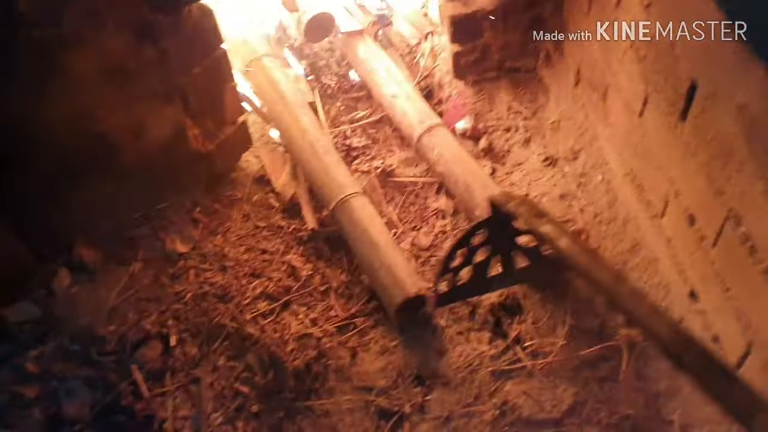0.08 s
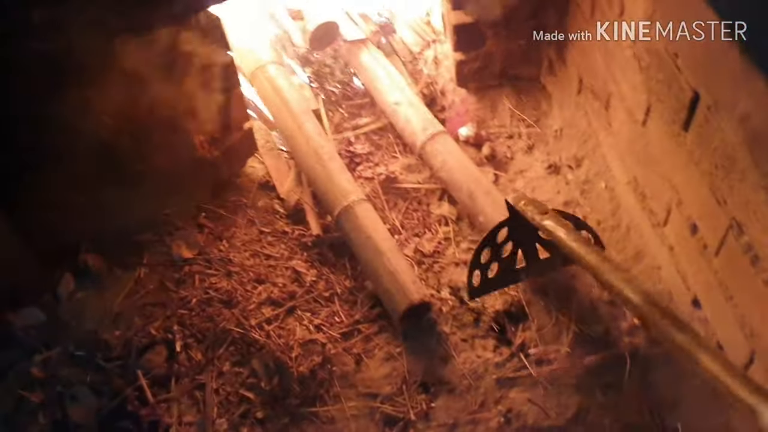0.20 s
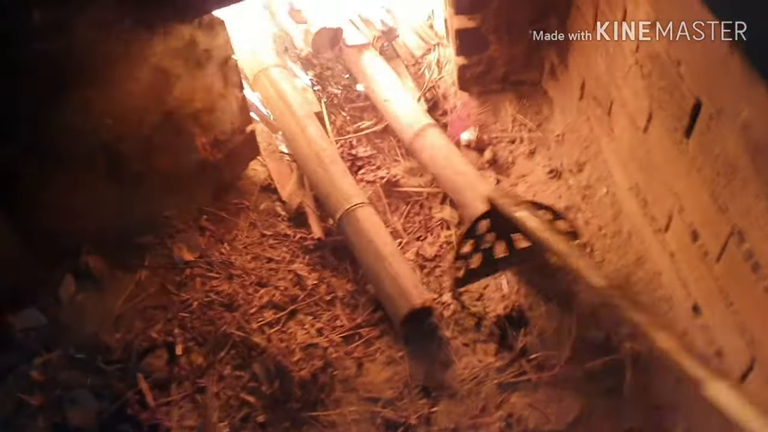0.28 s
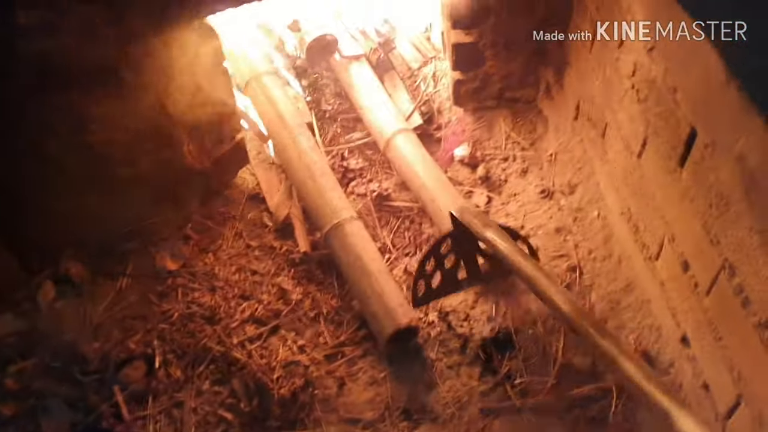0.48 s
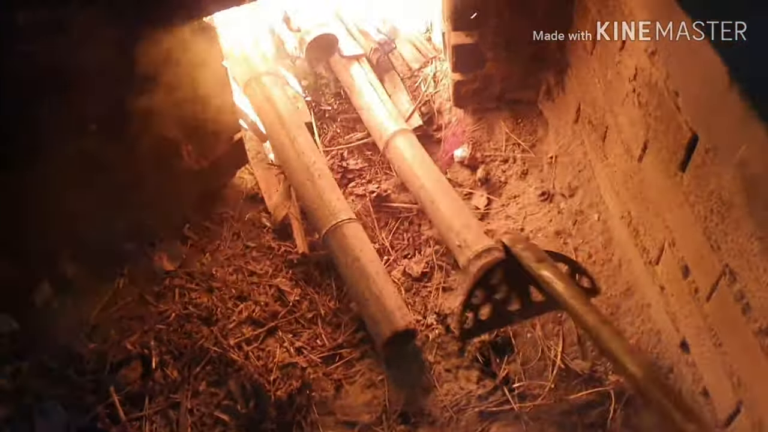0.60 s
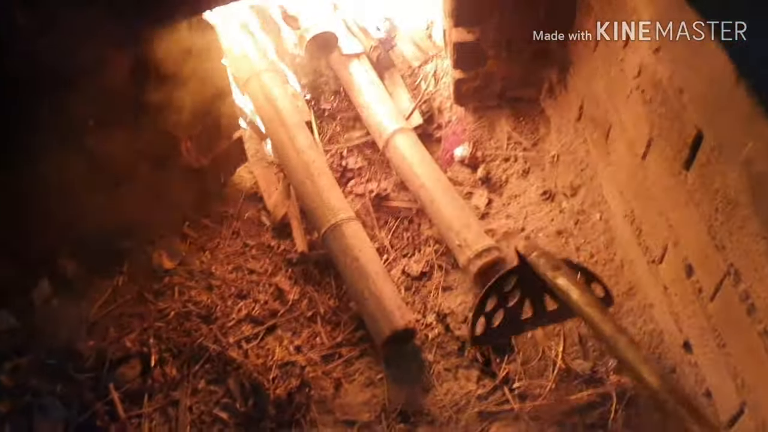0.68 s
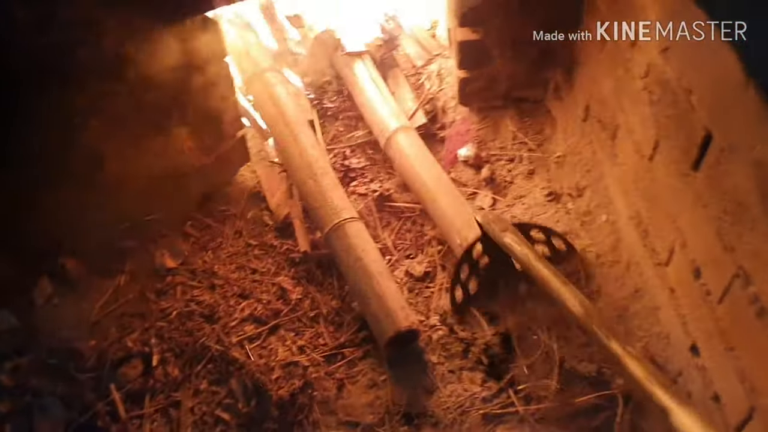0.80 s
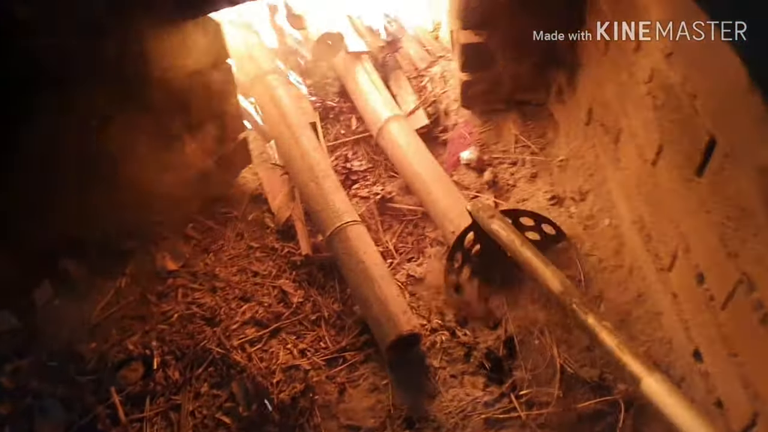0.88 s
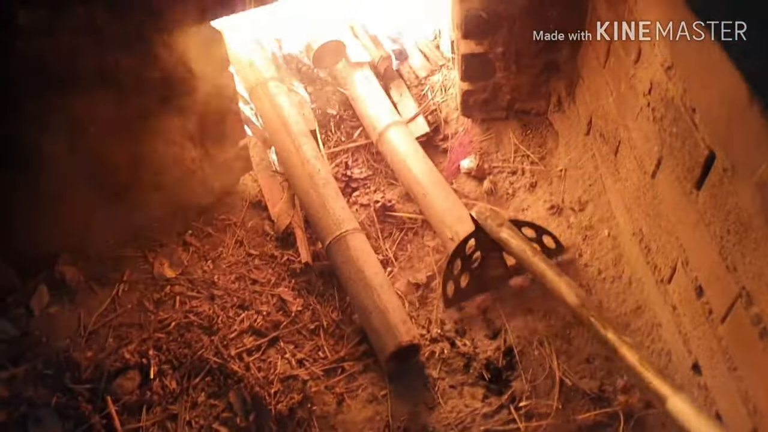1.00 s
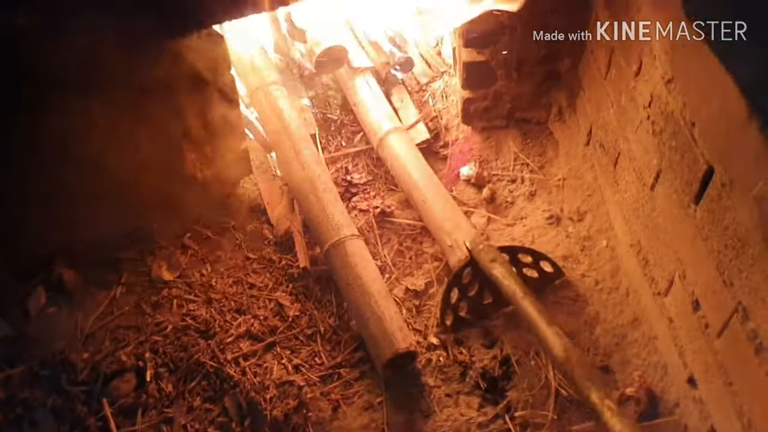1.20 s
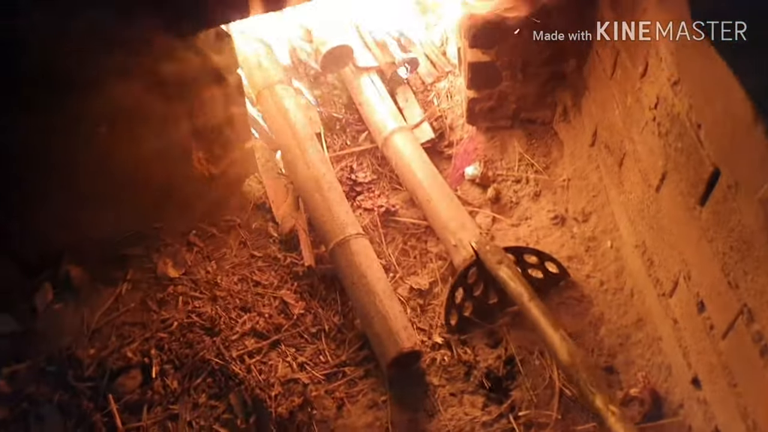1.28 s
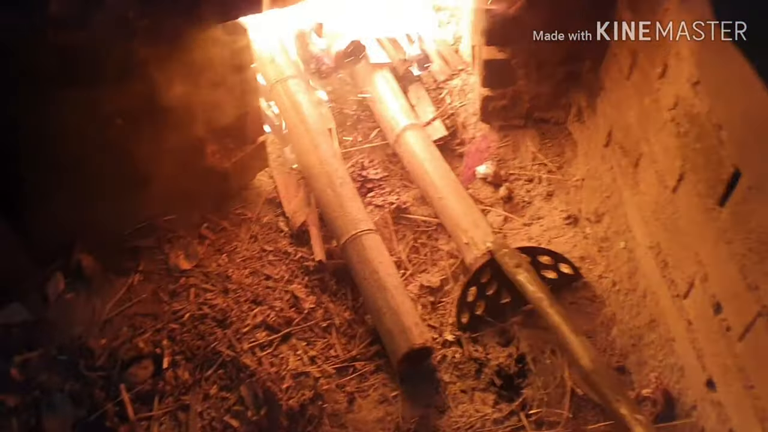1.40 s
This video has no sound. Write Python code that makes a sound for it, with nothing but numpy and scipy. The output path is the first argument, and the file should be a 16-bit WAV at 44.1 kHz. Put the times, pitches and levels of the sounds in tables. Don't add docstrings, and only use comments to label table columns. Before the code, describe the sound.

Bamboo poles clatter with sharp woody knocks, a bursting snap and a metal rake clank over fire

```python
import sys
import numpy as np
from scipy import signal
from scipy.io import wavfile

SR = 44100
rng = np.random.default_rng(int(sys.argv[2]) if len(sys.argv) > 2 else 0)


def to_wav(sig):
    pcm = np.clip(np.atleast_2d(sig), -1, 1) * 32767
    pcm = np.round(pcm).astype(np.int16)
    wavfile.write(sys.argv[1], SR, pcm.T)


def elevation(decibels):
    levels = np.asarray(decibels, float)
    return 10 ** (levels / 20)


N = 61740
T = np.arange(N) / SR
LEFT_LAG_S = .00014


def at_hz(points, hz, column=1):
    points = np.array(points)
    return np.interp(np.log(hz), np.log(points[:, 0]), points[:, column])


def rms_one(x):
    return x / np.sqrt(np.mean(x ** 2) + 1e-20)


def band_pass(x, low_hz, high_hz, order=2):
    return signal.sosfilt(signal.butter(order, [low_hz, high_hz], "band", fs=SR, output="sos"), x)


def high_pass(x, low_hz):
    return signal.sosfilt(signal.butter(2, low_hz, "high", fs=SR, output="sos"), x)


def drift(rate):
    r = np.exp(-80 * np.pi * rate / SR)
    slow = signal.lfilter([1], [1, -2 * r, r * r], rng.standard_normal(N // 40 + 2002))[2000:]
    return np.interp(np.arange(N) / 40, np.arange(len(slow)), rms_one(slow))


def ring(x, hz, t60):
    r, w = elevation(-60 / (t60 * SR)), 2 * np.pi * hz / SR
    return signal.lfilter([0, np.sin(w)], [1, -2 * r * np.cos(w), r * r], x + 1e-18)


def click(s):
    return (np.arange(N) == int(s * SR)) * 1.


def bands(white):
    # frequency in Hz, correlation from -1 to 1.
    likeness = [(60, 0.99), (250, 0.93), (700, 0.39), (1400, -0.2), (3000, 0.064), (12000, -0.23)]
    edges = np.minimum(24 * 2 ** np.arange(0, 10, .5), 17000)
    for k, (low, high) in enumerate(zip(edges, edges[1:])):
        mid, side = band_pass(white[k % 2], low, high)[:, -N:]
        hz = np.sqrt(low * high)
        alike = np.clip(at_hz(likeness, hz), -1, 1)
        stereo = np.sqrt(1 + alike) * mid + np.sqrt(1 - alike) * side * [[1], [-1]]
        yield hz, (high - low) ** .5, stereo


def knocks():
    # start in seconds, peak in dB, pitch in Hz, t60 in seconds.
    strokes = [(0.2485, -8.5, 1445, 0.014), (0.2528, -6, 1000, 0.0077), (0.2528, -6, 680, 0.0098),
               (.271, -19.5, 850, 0.028), (.2705, -14, 1155, 0.019), (.324, -17.5, 720, 0.023),
               (.337, -19, 633, 0.037), (.436, -25.5, 455, 0.03), (0.453, -28, 454, 0.055),
               (.791, -18, 775, 0.044), (0.7915, -13, 1513, 0.027), (0.841, -23, 830, 0.025),
               (0.797, -13.5, 1492, 0.018), (0.838, -18, 1120, 0.038), (.842, -13, 696, 0.039),
               (.882, -25, 750, 0.021), (.945, -32, 726, 0.026), (1.135, -40, 1510, 0.067),
               (1.169, -29.5, 2063, 0.024), (1.321, -43.5, 500, 0.053)]
    rise_s, level_db, longest_s = 0.0024, -4.5, .045
    pair, pair_db, overtone, overtone_db = 0.916, -19, 3.2, -10.5
    out = 0
    for s, db, hz, t60 in strokes:
        hit, t60 = click(s), np.clip(t60, .006, longest_s)
        modes = (ring(hit, hz, t60) + elevation(pair_db) * ring(hit, hz * pair, t60)
                 + elevation(overtone_db) * ring(hit, hz * overtone, 0.49 * t60))
        swell = modes * (1 - np.exp(-np.maximum(T - s, 0) / rise_s))
        out = out + elevation(db + level_db) * swell / np.abs(swell).max()
    return out


def thuds():
    # start in seconds, level in dB, pitch in Hz.
    booms = [
        (0.089, -50, 149),
        (.15, -33.5, 151),
        (.256, -14, 264.7),
        (.833, -28.5, 261),
        (0.874, -21.5, 385),
        (1.264, -38, 122.4),
        (1.316, -39, 113),
    ]
    return sum(elevation(db) * ring(ring(click(s), hz, .05), hz, 0.026) / 90 for s, db, hz in booms)


def choked():
    # start in seconds, peak in dB, pitch in Hz, length in seconds.
    notes_cut_short = [(0.2487, -8.5, 1228, 0.0086), (0.2615, -15, 752, 0.0079), (.2706, -20, 2370, 0.0056),
                       (.2866, -16, 745, .009), (0.3035, -15, 787, 0.0069), (.3046, -21.5, 1910, 0.0076),
                       (0.3153, -17, 795, 0.0057), (.3531, -21.5, 730, 0.0074), (0.3584, -23, 910, 0.0042),
                       (0.3996, -31.5, 755, 0.0085), (0.4191, -23.5, 500, .011),
                       (0.4693, -33.5, 515, 0.014), (0.8335, -15, 679, 0.01), (0.8332, -14.5, 1110, 0.0079),
                       (0.8724, -22.5, 762, 0.013), (1.1334, -39, 610, 0.0036), (1.1321, -43, 980, 0.0027),
                       (1.1641, -37.5, 661, 0.0055), (1.1757, -39.5, 621, .008)]
    pair, pair_db = 1.23, -9
    out, age = 0, T - np.array([[LEFT_LAG_S], [0]])
    for s, db, hz, length in notes_cut_short:
        progress = np.clip((age - s) / max(length, .003), 0, 1)
        swell = np.sin(np.pi * progress ** .75) ** .5
        turn = 2 * np.pi * hz * (age - s)
        out = out + elevation(db) * swell * (np.sin(turn) + elevation(pair_db) * np.sin(pair * turn))
    return out


def cracks():
    # start in seconds, peak in dB, length in seconds, lowest Hz, highest Hz.
    snaps = [(.2500, -2, .003, 2800, 7000), (.2505, -9, .002, 7000, 16000),
             (.6023, -4.5, .0014, 2500, 16000), (.6025, -13, .002, 500, 2800),
             (.148, -50, .002, 11000, 16000), (.152, -50, .002, 8000, 16000),
             (.3045, -14, .003, 1400, 4000), (.7935, -10, .003, 800, 5000), (.805, -10, .006, 2800, 9000),
             (.827, -14, .005, 2500, 5000), (1.081, -35, .005, 5000, 16000),
             (1.1315, -25, .0025, 350, 1200), (1.1635, -27, .003, 4000, 14000),
             (1.169, -24, .004, 500, 3600), (1.3195, -27, .004, 900, 3600)]
    pan_db, shared = -4, .75
    noise, out = rng.standard_normal((2, N)), 0
    for s, db, length, low_hz, high_hz in snaps:
        age = np.maximum(T - s, 0) / max(length, .0003)
        burst = elevation(db) * age * np.exp(-2 * age) * (noise + shared * noise[::-1])
        out = out + band_pass(burst + 1e-18, low_hz, high_hz)
    return out * elevation(pan_db * np.array([[.5], [-.5]]))


def rake():
    # start in seconds, level in dB.
    clanks = [
        (0.791, -25),
        (0.805, -20.5),
        (0.828, -30),
        (0.868, -31),
        (0.9, -41),
        (1.170, -47),
    ]
    # pitch in Hz, level in dB, t60 in seconds.
    iron = [(1545, -7, .07), (2333, -8, .08), (2695, -7, .09), (3214, -6, .09), (3460, -7, .07),
            (3850, -6, .04), (4420, -7, .05), (6085, -4, .06), (7250, -6, .04), (8210, -5, .06),
            (9781, -5, .06), (11220, -3, .06), (11640, -5, .07), (12560, -5, .05)]
    chatter_s, spread_db, side_share = .009, 4, 0.87
    out, luck = np.zeros((2, N)), rng.normal(0, 1, (len(clanks), len(iron)))
    for k, (hz, level_db, t60) in enumerate(iron):
        mid, side = rng.standard_normal((2, N)) / np.sqrt(chatter_s * SR / 2)
        hits = 0
        for (s, db), strike_luck in zip(clanks, luck):
            chatter = (T > s) * np.exp(-np.abs(T - s) / chatter_s)
            hits = hits + chatter * elevation(db + level_db + spread_db * strike_luck[k])
        out += ring(hits * (mid + side_share * side * [[1], [-1]]), hz, t60)
    return out


def tines():
    # start in seconds, level in dB, pitch in Hz, t60 in seconds.
    pings = [(.251, -28, 3930, 0.018), (.304, -27, 3556, 0.068), (.305, -30, 2310, 0.086),
             (0.791, -28, 11150, .06), (.791, -23, 4180, 0.052), (.798, -20, 15250, 0.044),
             (.803, -18, 9785, 0.088), (.805, -23, 6800, .04), (.804, -21, 13700, .04),
             (.804, -21, 12600, .05), (.812, -33, 11640, .06), (.822, -25, 15280, .05),
             (.826, -40, 8100, .05), (.828, -27, 10540, .05), (.826, -24.5, 3630, 0.049),
             (.845, -38, 8700, .05), (.856, -32, 15200, .04), (.866, -29, 6080, 0.079),
             (.866, -35.5, 10630, 0.087), (.868, -34, 12620, 0.08), (.870, -33, 13930, .06),
             (.872, -29, 4300, 0.065), (.876, -32, 6900, .06), (.888, -32, 8300, 0.11),
             (.890, -36, 10550, .08), (.899, -43, 9750, 0.055), (.899, -46, 11800, 0.055),
             (.915, -37, 8400, 0.1), (.925, -40, 10680, 0.071), (1.114, -48, 7550, .08),
             (1.114, -50, 8360, 0.056), (1.116, -53, 4400, 0.034), (1.157, -44, 11540, .06),
             (1.1635, -44, 6030, 0.064), (1.1645, -35, 13100, 0.025), (1.164, -45, 8170, .03),
             (1.185, -44.5, 2675, 0.08), (1.195, -50, 2070, .08)]
    touch_s, side_share, level_db = .004, 0.76, -2
    out, span = np.zeros((2, N + SR)), SR // 5
    touch = rng.standard_normal((len(pings), 2, span)) * np.exp(-T[:span] / touch_s)
    for (s, db, hz, t60), pair in zip(pings, touch):
        tone = ring(pair, hz, np.clip(t60, .02, .15))
        mid, side = tone / np.abs(tone).max(axis=1, keepdims=True)
        start = int(s * SR)
        out[:, start:start + span] += elevation(db + level_db) * (mid + side_share * side * [[1], [-1]])
    return out[:, :N]


def showers():
    # start in seconds, level in dB, hold in seconds, sag in dB/s, release in dB/s.
    bursts = [
        (0.247, -23, 0.15, 85, 149),
        (0.599, -26.5, 0.06, 35, 253),
        (0.789, -20, 0.15, 95, 211),
        (1.099, -47, 0.042, -9, 116),
    ]
    attacks, clumps = [0.0013, 0.0087, 0.0033, 0.016], [.7, .3, .45, .5]
    # frequency in Hz, level in dB per Hz.
    drag, vent = [(88, -49), (150, -18.5), (263, -7), (359, -8.5), (796, -6), (1320, -5), (2270, -4.5),
                  (2810, -11.5), (15500, -26.5)], [(180, -48), (300, -26), (620, -13), (769, -19), (4000, -6.5), (5390, -10.5),
                                (6150, -10), (11700, -3), (15500, -8)]
    scrape, shuffle = [(88, -22), (150, -15.5), (681, -7), (912, -10), (1110, -1), (1220, -4),
                       (1510, -14.5), (1910, -5.5), (15500, -23)], [(180, -30), (300, -2), (641, -9), (1700, -11.5), (2100, -17.5),
                                       (7140, -15), (13100, -26), (15500, -4)]
    # frequency in Hz, share of the sag, share of the release.
    linger = [(296, 0.76, 1.76), (1000, 0.55, 1.43), (4500, 1.35, 0.66), (12500, 0.51, 2.72)]
    grit_per_s, spread_db, clump_db = 12000, 1.3, 2.5
    grains = elevation(spread_db * rng.exponential(1, N)) * (rng.random(N) < grit_per_s / SR)
    white = rng.standard_normal((2, 2, N)) * rms_one(grains + 0.29)
    together = drift(22)
    split = [(hz, w, band, clump_db * drift(34) + 0.99 * together) for hz, w, band in bands(white)]
    out = 0
    for burst, attack, clump, colour in zip(bursts, attacks, clumps, (drag, vent, scrape, shuffle)):
        s, db, hold, sag, release = burst
        age = np.maximum(T - s, 0)
        sunk = sag * age
        released = release * np.logaddexp(0, (age - hold) / 0.024) * 0.014
        total = np.sqrt(sum((elevation(at_hz(colour, hz)) * w) ** 2 for hz, w, *_ in split) * 2 / SR)
        for hz, _, band, wander_db in split:
            fall_db = at_hz(linger, hz) * sunk + at_hz(linger, hz, column=2) * released
            level = elevation(db + clump * wander_db + at_hz(colour, hz) - fall_db) / total
            rise = 1 - np.exp(-age / (attack + 2.0 / hz))
            out = out + level * rise * band
    return out


def flame(split):
    # frequency in Hz, level in dB per Hz.
    colour = [(15, -43), (25, -49), (55, 1), (160, -5.5), (331, -12.5), (410, -19), (582, -17.5),
              (970, -24), (15500, -52)]
    # time in seconds, level in dB.
    flutter = [(0, 1), (.15, 1), (.25, 0.5), (.43, 10), (.54, 4.5), (.63, -1), (.72, 1.5), (.82, -1),
               (.95, 4), (1.08, -4), (1.14, 1), (1.22, -1), (1.4, -1)]
    lump, rumble = drift(18), 0
    for hz, _, band in split:
        lump_db = (2.6 * lump + 2.0 * drift(10.7)) * (hz < 500)
        rumble = rumble + elevation(at_hz(colour, hz) + lump_db) * band
    return rms_one(rumble) * elevation(-48.5 + np.interp(T, *np.transpose(flutter)))


def sap_hiss(split):
    # frequency in Hz, level in dB per Hz.
    colour = [(410, -46), (700, 5), (776, -30), (1090, -31), (1270, 4), (1650, 6), (4080, -28), (8760, -16),
              (15500, -10)]
    # time in seconds, level in dB.
    sizzle = [(0, -72.5), (.13, -87), (.23, -61), (.45, -52), (.75, -60), (1.05, -56), (1.2, -59.5),
              (1.4, -60.5)]
    peak_hz, peak_width_hz, peak_db = 4400, 840, 2.5
    hiss = rms_one(sum(elevation(at_hz(colour, hz) + 0.93 * drift(12)) * b for hz, _, b in split if hz > 600))
    peak = rms_one(ring(rng.standard_normal((2, N)), peak_hz, 1.7 / peak_width_hz))
    return (hiss + elevation(peak_db) * peak) * elevation(np.interp(T, *np.transpose(sizzle)))


def whistle():
    start_s, pitch_hz, width_hz = 1.16, 14400, 1100
    noise = rng.standard_normal((2, N))
    thin = rms_one(band_pass(noise, pitch_hz - width_hz / 2, pitch_hz + width_hz / 2))
    fizz = rms_one(high_pass(rng.standard_normal((2, N)), 9000))
    return (thin * elevation(-56.5) + fizz * elevation(-54)) * np.clip((T - start_s) / .03, 0, 1)


def fire():
    run_in = 8000
    split = list(bands(rng.standard_normal((2, 2, N + run_in))))
    return flame(split) + sap_hiss(split) + whistle()


def walls(x):
    t60_s, gap_s, level_db = .2, 0.0071, -11.5
    t = T[:SR // 2]
    scatter = rng.standard_normal((3, len(t))) * elevation(-60 * t / t60_s) * np.clip(t / gap_s - .5, 0, 1)
    scatter = band_pass(scatter[1:] + 2.44 * scatter[0], 400, 3700, order=1)
    scatter = scatter / np.sqrt(np.sum(scatter ** 2) / 2)
    return elevation(level_db) * signal.fftconvolve(x, scatter, axes=1)[:, :N]


def scene():
    wood, short = thuds() + knocks(), choked()
    wood = np.array([np.interp(T - LEFT_LAG_S, T, wood), wood])
    blows = wood + cracks() + rake() + tines()
    near = short + walls(blows + .5 * short) + showers()
    return blows + high_pass(near, 90) + fire()


def roll_off(x):
    return signal.sosfilt(signal.butter(12, 16650, fs=SR, output="sos"), x)


def record(dry):
    rounded = 1.527 * np.tanh(dry / 1.475)
    hissing = rounded + elevation(-64.5) * rng.standard_normal(dry.shape)
    top_cut = signal.cheby2(22, 45, 15820, fs=SR, output="sos")
    return roll_off(signal.sosfilt(top_cut, hissing))


dry = scene()
out = record(dry)
to_wav(out)
```